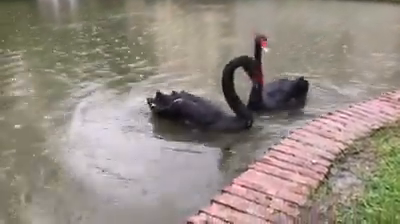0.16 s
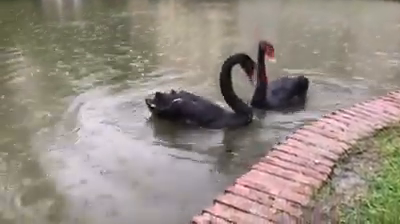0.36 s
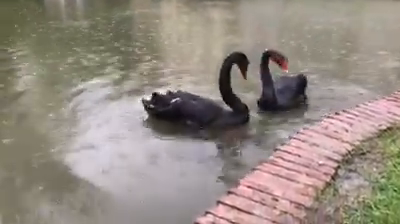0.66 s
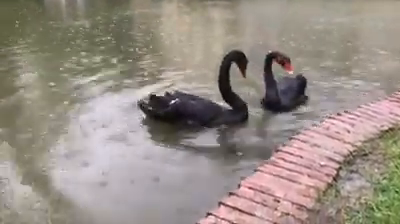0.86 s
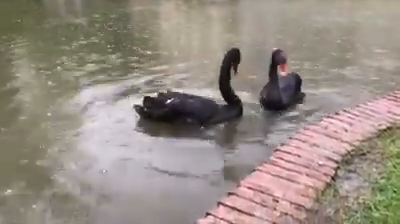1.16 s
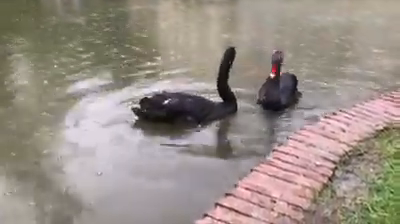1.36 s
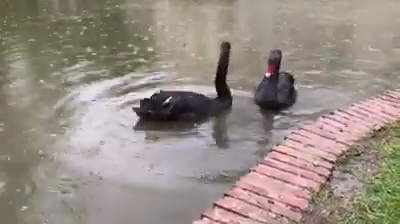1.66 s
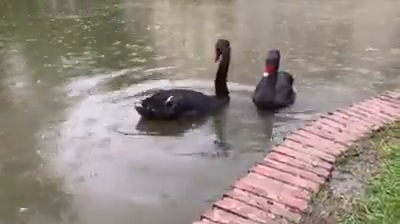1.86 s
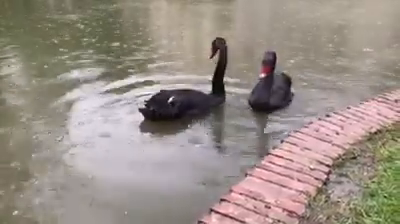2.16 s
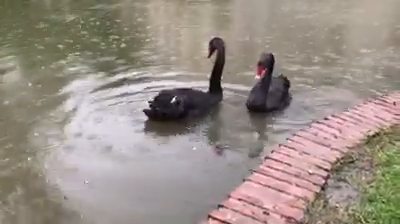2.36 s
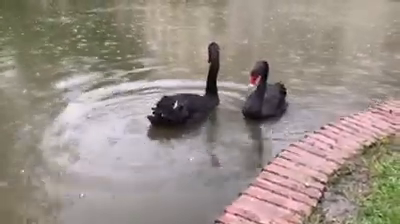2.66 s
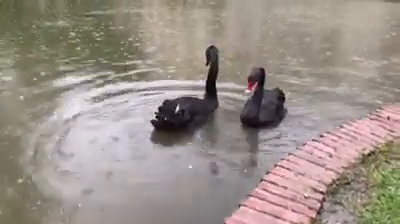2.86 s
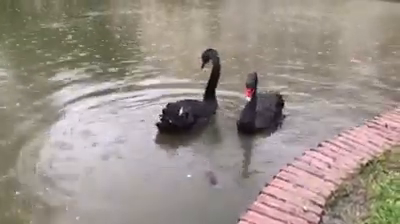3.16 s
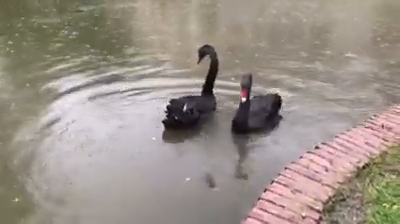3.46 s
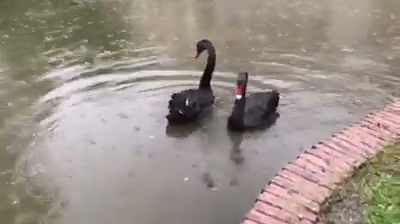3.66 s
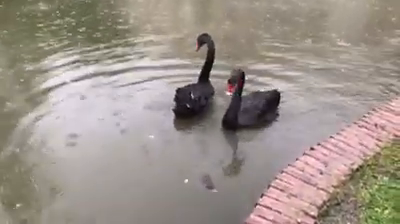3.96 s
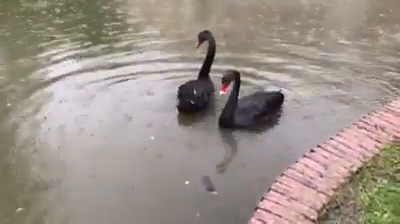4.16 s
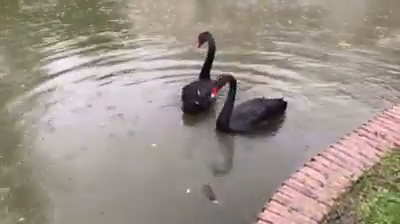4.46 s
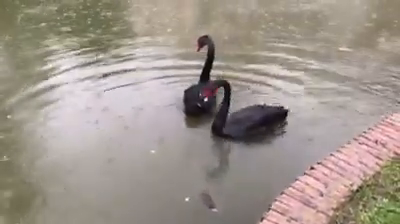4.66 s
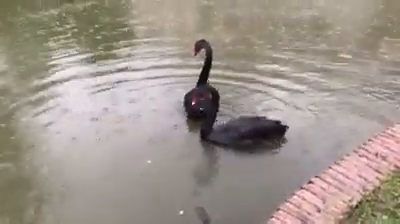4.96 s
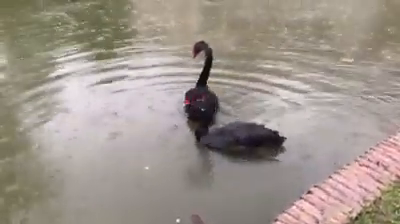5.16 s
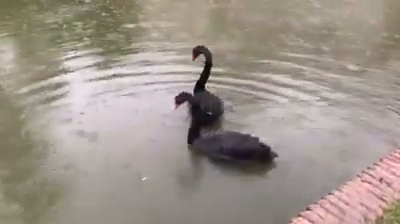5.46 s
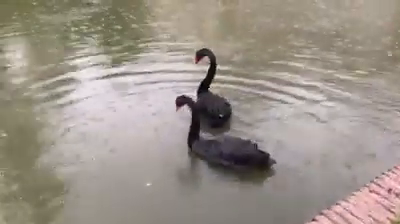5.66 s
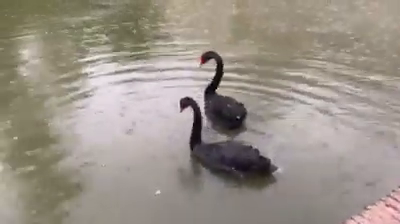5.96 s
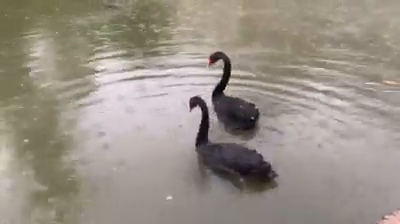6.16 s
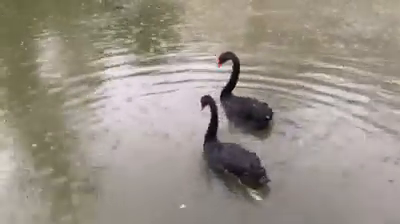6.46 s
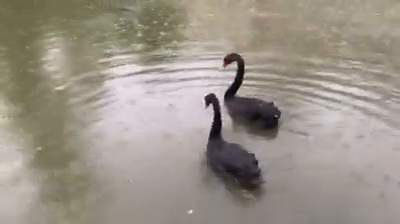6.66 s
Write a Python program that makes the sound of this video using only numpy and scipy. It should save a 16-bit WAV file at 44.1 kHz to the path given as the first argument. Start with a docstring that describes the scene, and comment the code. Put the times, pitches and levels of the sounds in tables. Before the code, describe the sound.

A quiet pond outdoors: constant low rumble of distant traffic, a thin, even hiss of open air and very faint fizzing wavelets. Small birds twitter throughout, high, short, falling chirps blurred by trees, with a fainter flock behind. At 0.55 seconds a close swan gives a reedy, nasal bugle of about a fifth of a second, cracking slightly with strain. At 1.2 a falling honk follows, then at 1.36 and 1.46 a rough, mellower note jumps straight into a brighter, higher one. The calls leave a faint bank echo. From 2 seconds, sparse tiny drops tick on the water, the clearest at 2.7. A clipped, raspy honk sounds at 3.1. Birds and rumble carry on until a faint hoot at 5.2 leads to a short rising toot at 5.3. At 5.7 a longer, mellow honk sinks, then flicks up into a sharp high yelp at 6.0. Background continues to about 7.

```python
"""Traffic rumble, the hiss of open air and fizzing wavelets sound throughout, as shaped noise.
Small birds chatter from the start: gliding, trembling tones wrapped in hiss and smeared by the trees.
From half a second two black swans bugle, reedy to mellow: harmonic tones that scoop, glide and may
strain into rasp; four honks come early, one near three seconds, four after five, with a faint bank tail.
From two seconds a few drops tick on the water, each a quickly dying burst of noise."""
import sys
import numpy as np
from scipy import signal
from scipy.fft import rfft, irfft
from scipy.io import wavfile

SR = 44100
rng = np.random.default_rng(int(sys.argv[2]) if len(sys.argv) > 2 else 0)


def bounce(signal):
    """Save signal as a 16-bit WAV file at the path given by the first command-line argument."""
    frames = np.transpose(np.atleast_2d(signal))
    limited = np.clip(frames, -1, 1)
    pcm = np.round(limited * 32767).astype(np.int16)
    wavfile.write(sys.argv[1], SR, pcm)


N = 300321

# Spectrum of the distant traffic: frequency_hz, relative_density_db
RUMBLE_SPECTRUM = [(15, -44), (25, -23), (38, -9), (52, -2.5), (68, 2.5), (82, -6.5), (120, -10),
                   (200, -16), (300, -22), (450, -31), (900, -51), (2500, -102)]
# Course of the traffic level: time_s, level_db (before a small random swell)
TRAFFIC_LEVEL = [(0, -43), (0.7, -42.5), (1.2, -43), (2.1, -42.5), (4.3, -43), (5.0, -45), (5.6, -42),
                 (6.1, -43), (6.8, -42.5)]
# Spectrum of the open air: frequency_hz, relative_density_db
AIR_SPECTRUM = [(200, -5), (500, 0.5), (1000, 4.5), (1600, 3.5), (2300, 0), (3200, -2.5), (4250, 1.5),
                (4650, -18), (7000, -11.5), (10000, -19), (12500, -10), (15000, -9.5)]
# Bands of fizzing wavelets: centre_hz, relative_level_db
RIPPLE_BANDS = [(3000, 6.5), (4200, 5), (5600, -2), (7500, -5.5), (11000, -2.5)]
# Drops and plops on the water: start_s, level_db (before decay), centre_hz, width_octaves
WATER_DROPS = [(2.055, -40, 1400, 0.64), (2.705, -34, 5000, 2), (3.639, -45, 1800, 0.59),
               (3.739, -40, 1820, 0.68), (4.265, -46, 6000, 0.54), (4.409, -40.5, 12000, 0.23),
               (5.56, -49, 5000, 0.69), (5.77, -47, 5350, 0.46), (6.524, -45.5, 6460, 1)]
# Nearer chirps of small birds: start_s, length_s, start_hz, level_db (before mixing)
NEAR_CHIRPS = [(0.365, 0.11, 3870, -47), (0.904, 0.115, 3770, -46), (1.079, 0.057, 4340, -53),
               (1.138, 0.025, 5550, -53), (1.574, 0.064, 3750, -43.5), (1.688, 0.06, 5800, -53),
               (1.892, 0.049, 3870, -49.5), (1.937, 0.028, 4300, -38), (2.337, 0.05, 4380, -55),
               (2.792, 0.048, 4700, -49.5), (3.071, 0.055, 4190, -47.5), (3.257, 0.11, 4140, -53),
               (3.576, 0.028, 4440, -52), (3.801, 0.07, 5790, -52.5), (3.872, 0.042, 4250, -50.5),
               (4.016, 0.082, 4440, -52), (4.366, 0.074, 4350, -54), (4.474, 0.035, 5730, -49),
               (4.537, 0.05, 5100, -52), (4.744, 0.033, 4880, -49.5), (4.765, 0.058, 4010, -43.5),
               (4.85, 0.06, 4830, -47.5), (4.919, 0.025, 3990, -44.5), (5.209, 0.035, 3090, -50.5),
               (5.467, 0.11, 4370, -54), (6.046, 0.1, 4250, -47.5), (6.225, 0.03, 5000, -47.5),
               (6.251, 0.085, 3720, -45.5), (6.4, 0.017, 3110, -47.5), (6.741, 0.035, 4400, -49)]
# Reverberation among the trees: frequency_hz, t60_s
TREE_DECAY = [(2000, 0.12), (4000, 0.56), (8000, 0.3)]
# Reverberation of the pond and its banks: frequency_hz, t60_s
BANK_DECAY = [(700, 0.76), (2000, 0.78), (4500, 0.84), (10000, 0.13)]
# Honks: start_s, length_s, pitch_hz, glide_hz_per_s, closing_flick_hz, base_level_db, swell_db_per_s,
#        attack_s, release_s, brightness_db_per_octave, final_dulling_db_per_octave, hollowness_db,
#        roughness_0_to_1, strain_moment_s, strain_0_to_1
HONK_GESTURES = [(0.549, 0.213, 821, -190, 62, -40, -12, 0.027, 0.022, 2.5, 4, 11, 0.16, 0.727, 0.6),
                 (1.196, 0.18, 902, -460, 0, -42.5, -3, 0.018, 0.045, 2.5, 30, -3, 0.12, 1.258, 0.35),
                 (1.36, 0.12, 734, 12, 7, -35, 12, 0.034, 0.027, -2.2, -2.5, -0.5, 0.25, 1.432, 0.13),
                 (1.46, 0.094, 912, 204, 12.5, -41.5, 5, 0.0082, 0.023, 1.2, 7, -1, 0.1, 1.486, 0.63),
                 (3.111, 0.051, 820, 900, -2, -46, -20, 0.015, 0.018, 0.1, 14, -2, 0.36, 3.131, 0.8),
                 (5.225, 0.108, 780, -100, -2, -55.5, 0, 0.017, 0.015, -4, 0, 0, 0, 5.25, 0),
                 (5.321, 0.059, 822, 750, -1, -33.5, -20, 0.021, 0.032, 0.5, 13, -2, 0.07, 5.34, 0.3),
                 (5.718, 0.28, 715.4, -58, 54.5, -36.5, 0.5, 0.026, 0.0082, 0.3, 2, -5.5, 0.11, 5.968, 0.7),
                 (5.991, 0.065, 947, 257, -6, -29.5, -65, 0.019, 0.021, 0.3, -6, 1, 0.12, 6.01, 0.34)]
# Colour the windpipe gives each honk, one list a honk: harmonic_number, relative_level_db
WINDPIPE_COLOURS = [
    [(1.0, -1), (2.0, 1), (3.0, -7.5), (4.0, -2), (5.0, -11.5), (6.0, -21), (7.0, -21), (8.0, -26.5),
     (9.0, -26), (10.0, -29), (11.0, -34)],
    [(1.0, -0.5), (2.0, -4.5), (3.0, -3.5), (4.0, -3), (5.0, -14), (6.0, -30), (7.0, -28)],
    [(1.0, -1), (2.0, -22), (3.0, -8), (4.0, -44.0), (5.0, -12.5), (6.0, -16), (7.0, -31)],
    [(1, -1), (2, 3), (3, -2), (4, -1), (5, -2), (6, -27), (7, -19), (8, -28), (9, -30), (10, -26.5),
     (11, -32)],
    [(1.0, -1), (2.0, 6.0), (3.0, -1.5), (4.0, 2.5), (5.0, -7), (6.0, -12), (7.0, -16.5)],
    [(1, -2), (2, -27)],
    [(1, -1), (2, -16.5), (3, -11.5), (4, -16.5), (5, -23), (6, -50)],
    [(1.0, -1), (2.0, -19.5), (3.0, -17.5), (4.0, -10), (5.0, -22.5), (6.0, -31), (7.0, -35)],
    [(1, -2), (2, -17), (3, -8.5), (4, -10), (5, -17), (6, -37)],
]
# Spectrum of the rasp in a rough honk: frequency_hz, relative_density_db
RASP_SPECTRUM = [(400, -21), (900, -1.5), (2000, -1), (3600, -2), (4600, 1), (5600, -15), (7000, -3.5),
                 (10000, -12.5), (15000, -33)]
# Thin squeaks off the harmonic series of the honks: start_s, length_s, start_hz, end_hz, level_db
SYRINX_SQUEAKS = [(.552, .125, 4965, 4930, -47), (.705, .04, 4950, 4950, -55),
                  (1.215, .095, 6050, 6030, -57), (1.472, .014, 5130, 5070, -34),
                  (5.98, .33, 4670, 4665, -59.5)]
# Beating between the two sides of the syrinx: time_s, depth_0_to_1
SYRINX_BEATING = [(1.36, 0), (1.38, .6), (1.455, .55), (1.465, 0)]

AIR_DB = -52.97
DROP_DECAY_S = 0.0025  # time constant
CHIRP_FALL = 0.18  # share of its pitch by which a nearer chirp slurs down
CHIRP_HISS_OCTAVES = 0.25  # from the centre to the half-power point
BEAT_HZ = 137
SCOOP_HZ, SCOOP_S = 49.3, 0.00947  # a honk starts this far below its pitch and slides up
FLICK_S = 0.08  # the pitch may flick over these last moments
BRIGHT_PER_DB = 0.85  # dB per octave gained with each dB of effort
STRAIN_S, STRAIN_DB, STRAIN_ROUGH = 0.0093, 4, 0.4  # width, and extra level and roughness at full strain
EDGE_HZ = 14950


def gain_of(db):
    """Level law: an amplitude ratio is ten to the power of decibels over twenty."""
    return 10 ** (np.asarray(db) / 20)


def evened(x):
    """Normalisation of power: scales a signal to rms 1."""
    return x / np.sqrt(np.mean(x ** 2) + 1e-20)


def read(points, hz):
    """Interpolation of a curve along a logarithmic frequency axis."""
    f, value = np.transpose(points)
    return np.interp(np.log(hz + 1), np.log(f + 1), value)


def add(mix, s, sound):
    """Superposition: adds a sound to the mix from time s."""
    part = mix[max(round(s * SR), 0):][:len(sound)]
    part += sound[:len(part)]


def noise(size, colour_db):
    """Spectral shaping: white noise weighted by a function of frequency in dB, at rms 1."""
    spectrum = rfft(rng.standard_normal(size))
    weight = gain_of(colour_db(np.fft.rfftfreq(size, 1 / SR)))
    return evened(irfft(spectrum * weight, size))


def wander(size, rate_hz):
    """Slow random modulation: low-passed noise of rms about 1, 3 dB down at the rate."""
    longer = noise(size + SR // 4, lambda hz: -3 * np.minimum(hz / rate_hz, 10) ** 2)
    return longer[:size]


def tail(x, t60s, rise_s):
    """Diffuse reverberation: scattered reflections build up, then decay at a rate set by frequency."""
    hz, t, z = signal.stft(rng.standard_normal(SR), SR, nperseg=256)
    decay = gain_of(-60 * t / read(t60s, hz)[:, None])
    build_up = 1 - np.exp(-t / rise_s)
    response = signal.istft(z * decay * build_up, SR, nperseg=256)[1]
    return signal.fftconvolve(x, response / np.linalg.norm(response))[:N]


def whistle(s, length, start_hz, end_hz, db, wobble):
    """Frequency modulation: a short gliding tone whose pitch trembles."""
    size = int(length * SR)
    hz = np.linspace(start_hz, end_hz, size) * (1 + wobble * wander(size, 220))
    tone = np.sqrt(2) * np.sin(2 * np.pi * np.cumsum(hz) / SR)
    return s, gain_of(db) * tone * signal.windows.tukey(size, .5)


def background(rumble_swell_db=.5, air_swell_db=1.0):
    """Broadband ambience: low traffic rumble that comes and goes, and a thin, nearly even hiss."""
    level_db = np.interp(np.arange(N) / SR, *np.transpose(TRAFFIC_LEVEL))
    rumble_db = level_db + rumble_swell_db * wander(N, 1.1)
    rumble = noise(N, lambda hz: read(RUMBLE_SPECTRUM, hz)) * gain_of(rumble_db)
    air_db = AIR_DB + air_swell_db * wander(N, 6.4)
    air = noise(N, lambda hz: read(AIR_SPECTRUM, hz)) * gain_of(air_db)
    return rumble + air


def ripples(level_db=-63, patchy_db=3.0, grain_db=2.5):
    """Independent modulation of noise bands: wavelets fizz, each band coming and going by itself."""
    out = np.zeros(N)
    for centre_hz, db in RIPPLE_BANDS:
        band = noise(N, lambda hz: -30 * np.log2((hz + 1) / centre_hz) ** 2)
        swell_db = patchy_db * wander(N, 4.4) + grain_db * wander(N, 79)
        out += gain_of(db) * evened(band * gain_of(swell_db))
    return gain_of(level_db) * out


def drops():
    """Exponential decay: a drop is a tick of band noise that dies within milliseconds."""
    out, t = np.zeros(N), np.arange(8192) / SR
    for s, db, centre_hz, octaves in WATER_DROPS:
        tick = noise(len(t), lambda hz: -4 * (np.log2((hz + 1) / centre_hz) / octaves) ** 2)
        add(out, s, gain_of(db) * tick * np.exp(-t / DROP_DECAY_S))
    return out


def chirp(s, length, start_hz, end_hz, db, wobble=0.033, grain_db=3.0, hiss_db=-7):
    """Tone plus turbulence: a trembling glide that swells and stutters, wrapped in a hoarse hiss."""
    _, tone = whistle(s, length, start_hz, end_hz, db, wobble=wobble)
    size = len(tone)
    centre_hz = (start_hz + end_hz) / 2

    def hiss_colour(hz):
        octaves = np.log2((hz + 1) / centre_hz)
        return -10 * np.log10(1 + (octaves / CHIRP_HISS_OCTAVES) ** 4)

    hiss = gain_of(db + hiss_db) * noise(size, hiss_colour) * signal.windows.hann(size)
    swell = signal.windows.tukey(size, .5)
    stutter = gain_of(grain_db * wander(size, 230))
    return s, (tone + hiss) * evened(swell * stutter)


def small_birds(direct_db=-2, trees_db=-6, flock_db=-55, spread_db=13, count=80):
    """Multiple scattering: trees smear the falling chirps and a fainter flock chattering behind them."""
    out = np.zeros(N)
    for s, length, hz, db in NEAR_CHIRPS:
        add(out, *chirp(s, length, hz, hz * (1 - CHIRP_FALL), db))
    # the flock: one chirp at a random moment in each equal slot of time
    for k, (when, length, pitch, glide, far) in enumerate(rng.random((count, 5))):
        s = (k + when) / count * N / SR
        length_s = .015 + .04 * length
        hz = 3000 + 1700 * pitch
        end_hz = hz * (1.1 - 0.32 * glide)
        add(out, *chirp(s, length_s, hz, end_hz, flock_db - spread_db * far))
    return gain_of(direct_db) * out + gain_of(trees_db) * tail(out, TREE_DECAY, rise_s=0.0027)


def gesture(s, length, pitch_hz, glide, flick_hz, db, swell, attack_s, release_s,
            tilt_db, dull_db, hollow_db, rough, strain_s, strain):
    """Effort governs level and brightness together, while pitch scoops, glides and flicks."""
    age = np.arange(0, length, 1 / SR)
    left, done = length - age, age / length
    push = strain * np.exp(-.5 * ((s + age - strain_s) / STRAIN_S) ** 2)
    attack = np.sin(np.pi / 2 * np.minimum(age / attack_s, 1))
    release = np.sin(np.pi / 2 * np.minimum(left / release_s, 1))
    opening = attack * release
    effort_db = 20 * np.log10(np.maximum(opening ** 2, 1e-3)) + swell * age + STRAIN_DB * push
    scoop = np.exp(-age / SCOOP_S)
    flick = np.cos(np.pi / 2 * np.minimum(left / FLICK_S, 1)) ** 2
    hz = pitch_hz + glide * age - SCOOP_HZ * scoop + flick_hz * flick
    bright_db = tilt_db + BRIGHT_PER_DB * effort_db - dull_db * done ** 4
    hollow = np.sin(np.pi * done ** 2) ** 2  # strongest about seven tenths of the way
    return s + age, hz, db + effort_db, bright_db, hollow_db * hollow, rough + STRAIN_ROUGH * push


def honk(row, throat, jitter=0.036, flutter=0.1, rasp_db=0, roll_off_db=3):
    """Source and filter: the syrinx buzzes through the windpipe; roughness shakes it and adds pulsed rasp."""
    t, hz, level_db, bright_db, hollow_db, rough = gesture(*row)
    shaken_hz = hz * (1 + jitter * rough * wander(len(t), 180))
    phase = 2 * np.pi * np.cumsum(shaken_hz) / SR
    beat_depth = np.interp(t, *np.transpose(SYRINX_BEATING))
    orders, colour_db = np.transpose(throat)
    voice = np.zeros(len(t))
    for k in range(1, 17):
        # above the windpipe's resonances the harmonics fade
        db = np.interp(k, orders, colour_db) - roll_off_db * max(k - len(orders), 0)
        # positive hollowness weakens every third harmonic, negative strengthens it
        db = db + bright_db * np.log2(min(k, len(orders))) - hollow_db * (k % 3 == 0) * min(k / 3, 2)
        turn = k * phase + k * k  # the windpipe spreads each pulse in time
        partial = np.cos(turn) + (k > 1) * beat_depth * np.cos(turn + 2 * np.pi * BEAT_HZ * t)
        unsteady = 1 + flutter * rough * wander(len(t), 180)
        voice += gain_of(db) * unsteady * np.sqrt(2) * partial
    pulses = 1 + np.cos(phase)
    rasp = gain_of(rasp_db) * rough ** 2 * pulses * noise(len(t), lambda f: read(RASP_SPECTRUM, f))
    return t[0], gain_of(level_db) * (voice + rasp)


def swans(banks_db=-29, echo_db=-25, echo_s=.25):
    """Direct and reflected sound: close honks, nearly dry, with a faint tail and dull echo off the bank."""
    out = np.zeros(N)
    for row, throat in zip(HONK_GESTURES, WINDPIPE_COLOURS):
        add(out, *honk(row, throat))
    for row in SYRINX_SQUEAKS:
        add(out, *whistle(*row, wobble=0.00075))
    returned = gain_of(banks_db) * tail(out, BANK_DECAY, rise_s=0.018)
    dulled = signal.lfilter(*signal.butter(1, 2000, fs=SR), out)
    add(returned, echo_s, gain_of(echo_db) * dulled)
    return out + returned


def scene():
    """Linear superposition of every source on the pond, in mono."""
    return (background() + ripples() + drops() + small_birds() + swans())[None]


def record(dry):
    """Band limitation: a steep linear-phase low-pass sets the recorder's upper edge."""
    low_pass = signal.firwin(1023, EDGE_HZ, window=("kaiser", 9), fs=SR)
    return signal.oaconvolve(dry, low_pass[None], "same")


dry = scene()
out = record(dry)
bounce(out)
```